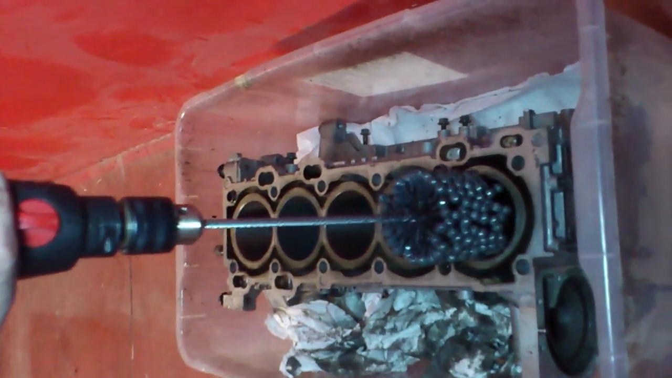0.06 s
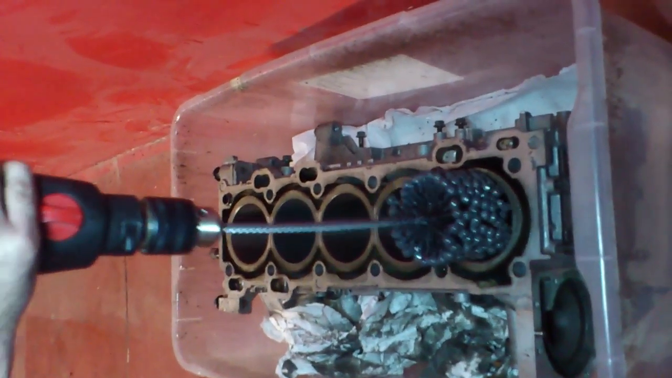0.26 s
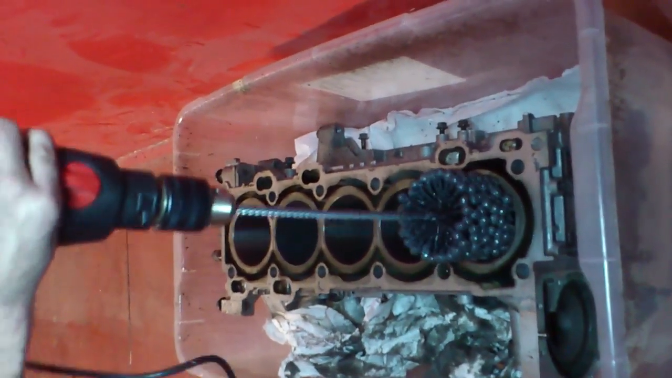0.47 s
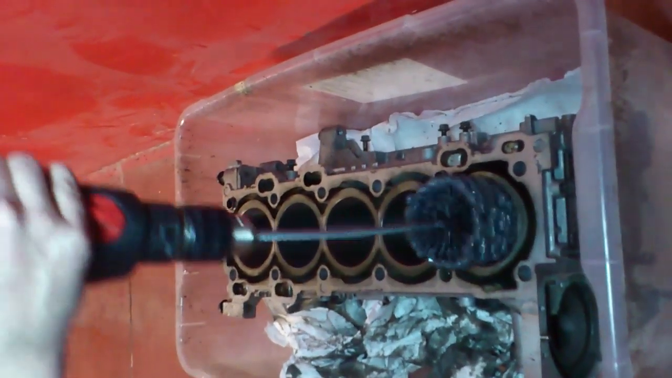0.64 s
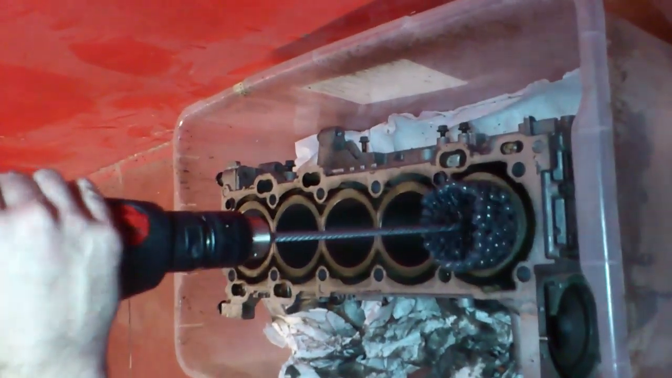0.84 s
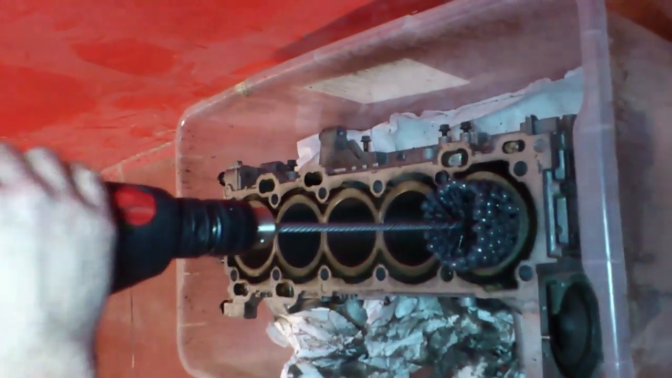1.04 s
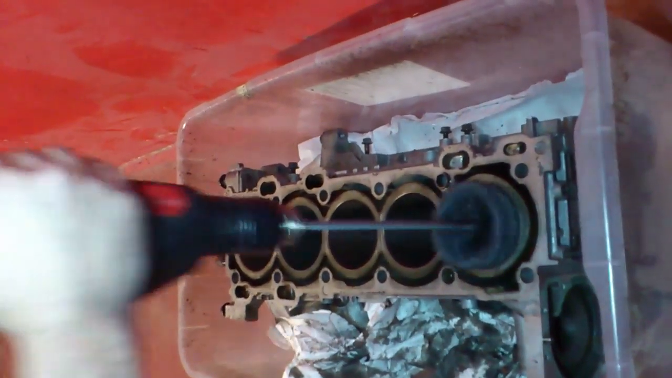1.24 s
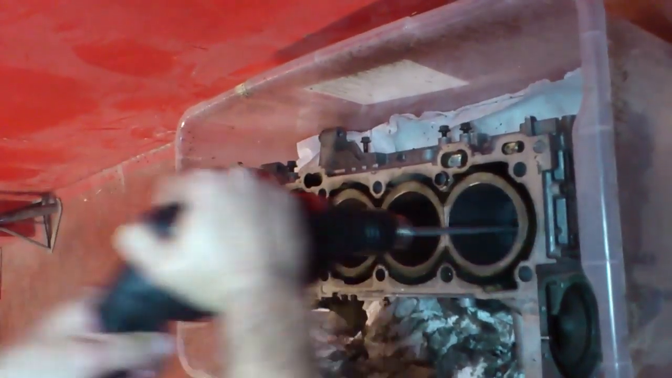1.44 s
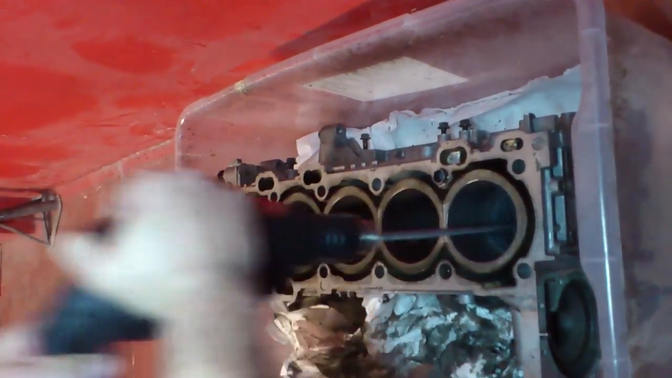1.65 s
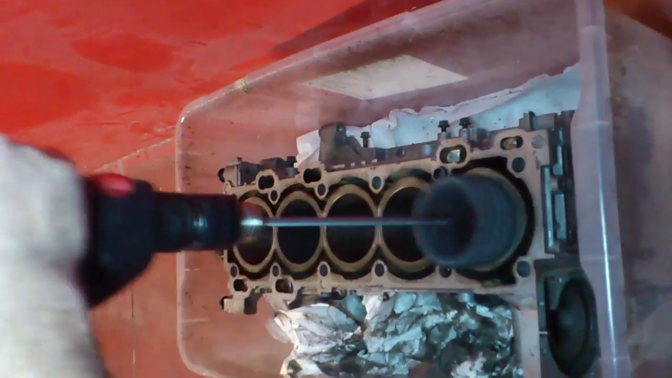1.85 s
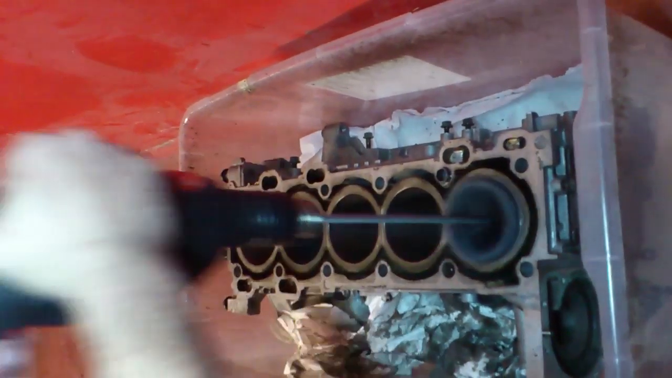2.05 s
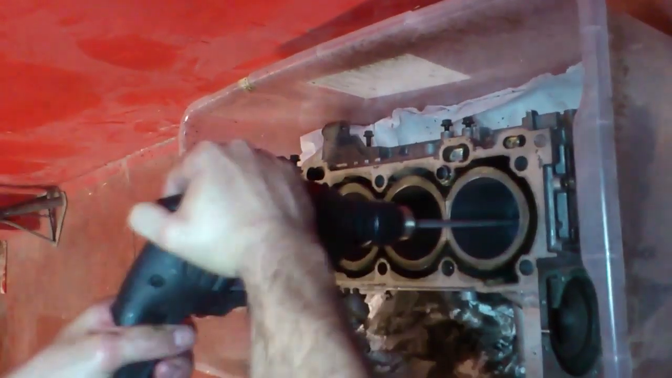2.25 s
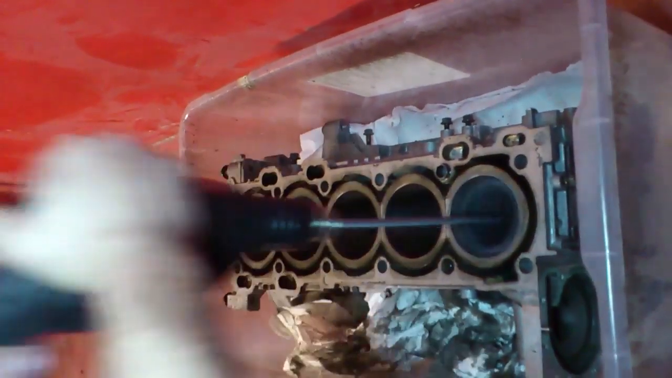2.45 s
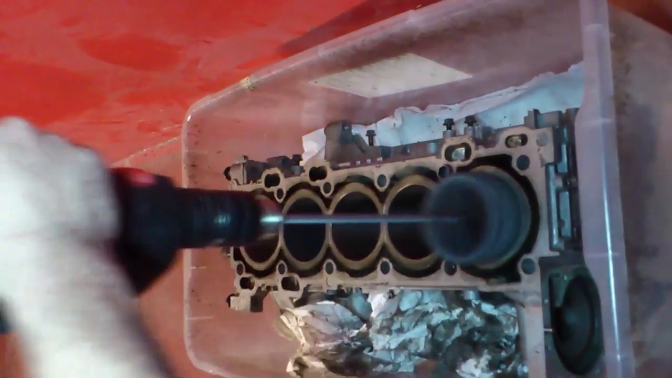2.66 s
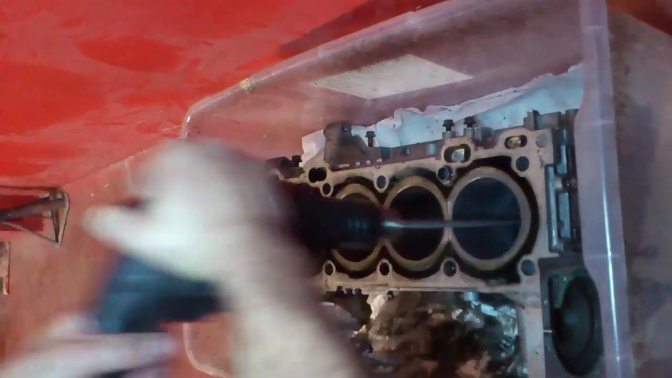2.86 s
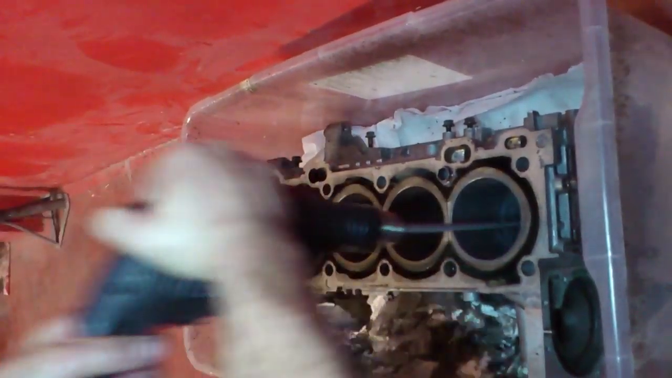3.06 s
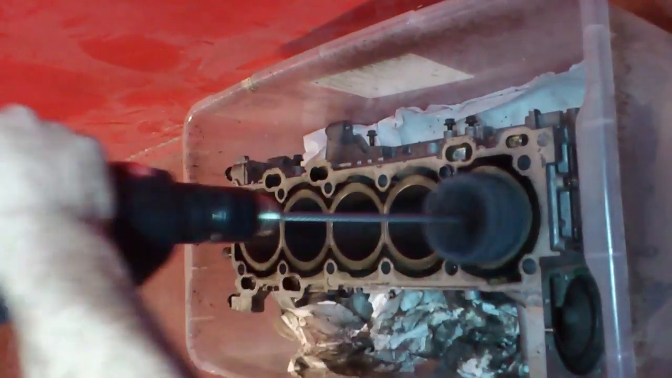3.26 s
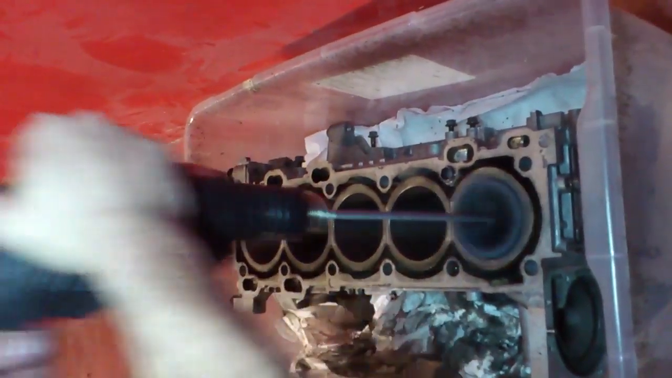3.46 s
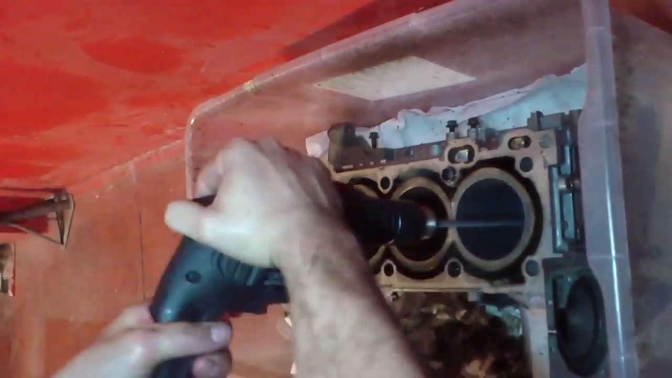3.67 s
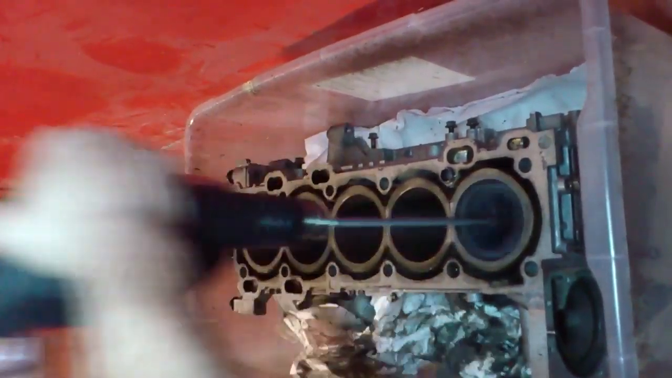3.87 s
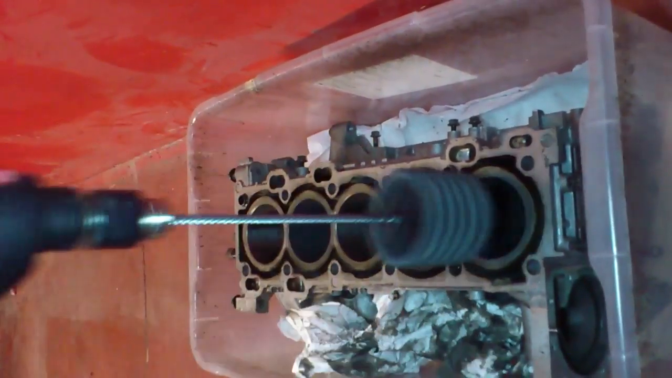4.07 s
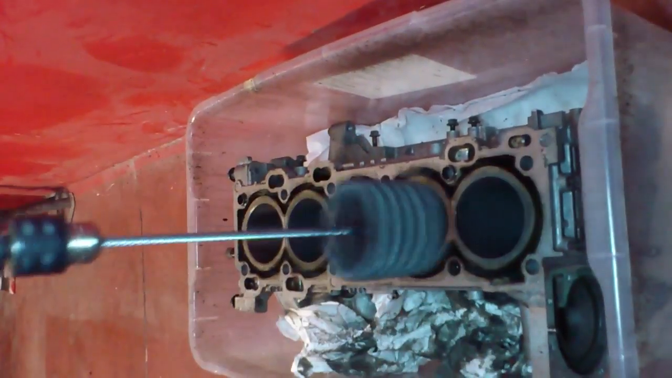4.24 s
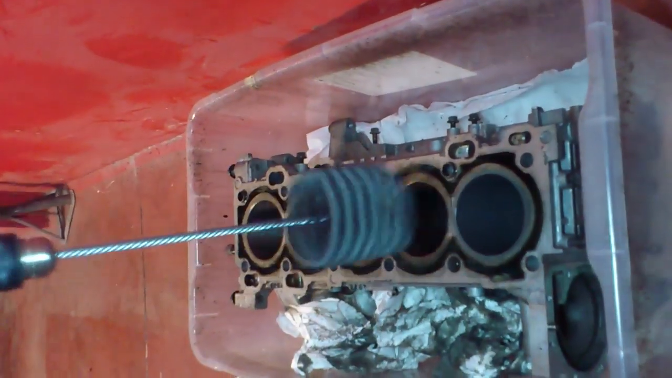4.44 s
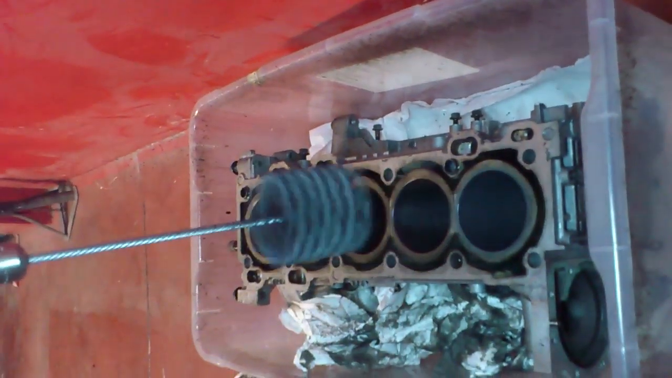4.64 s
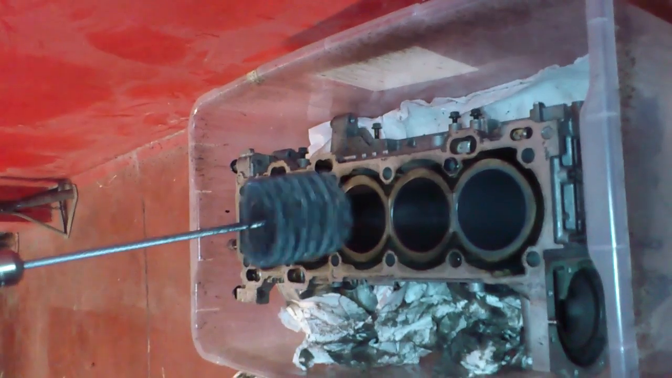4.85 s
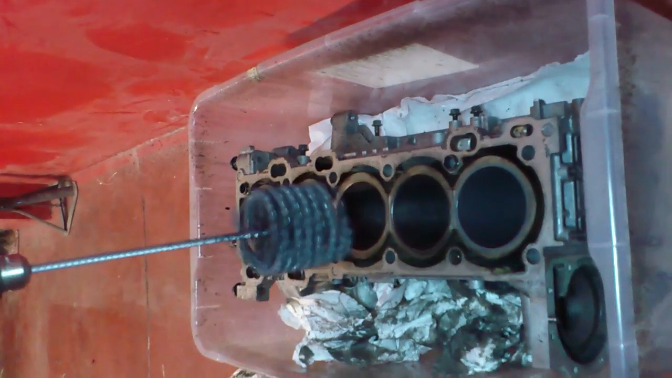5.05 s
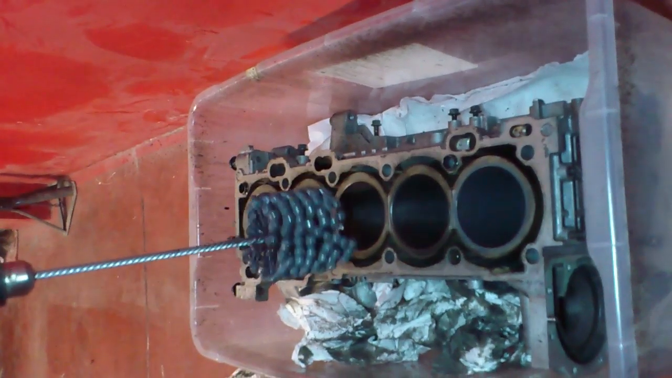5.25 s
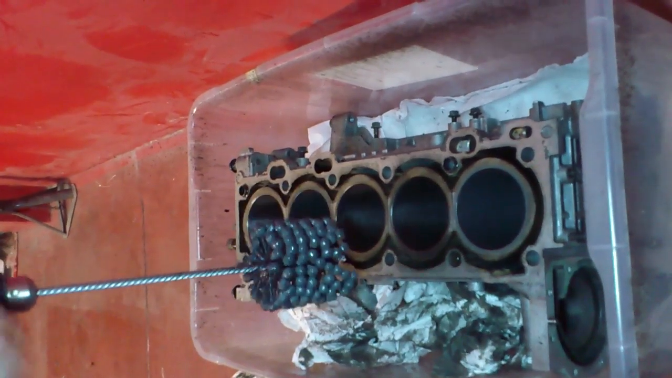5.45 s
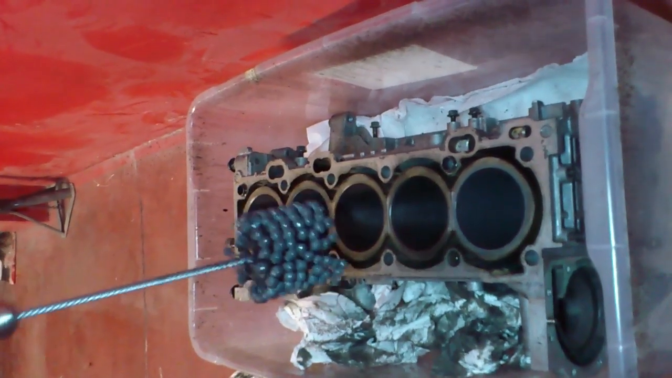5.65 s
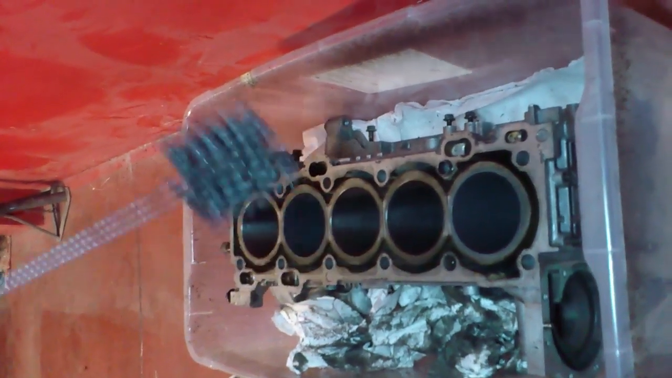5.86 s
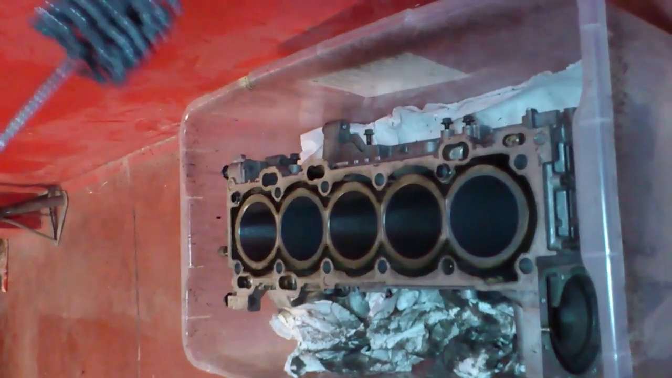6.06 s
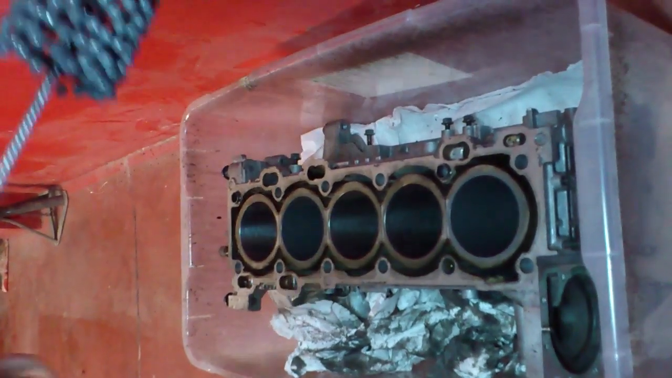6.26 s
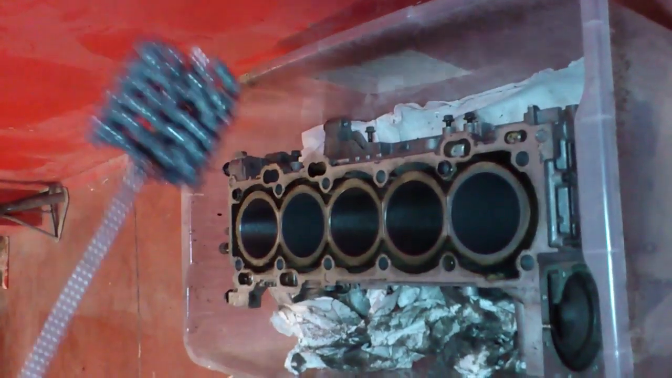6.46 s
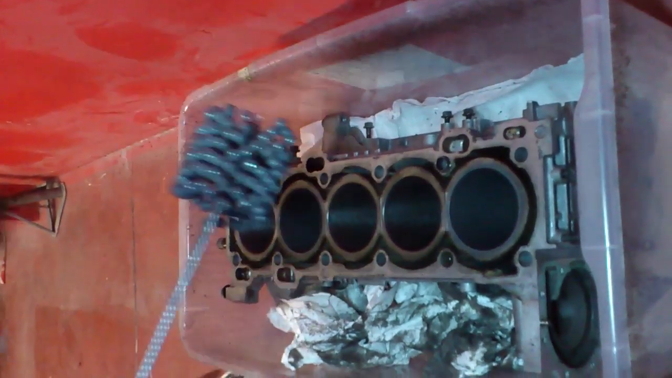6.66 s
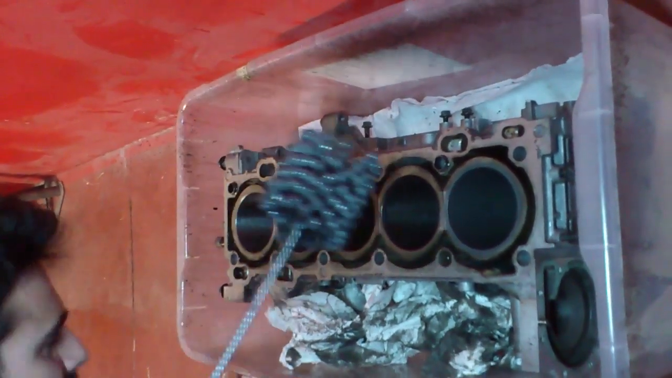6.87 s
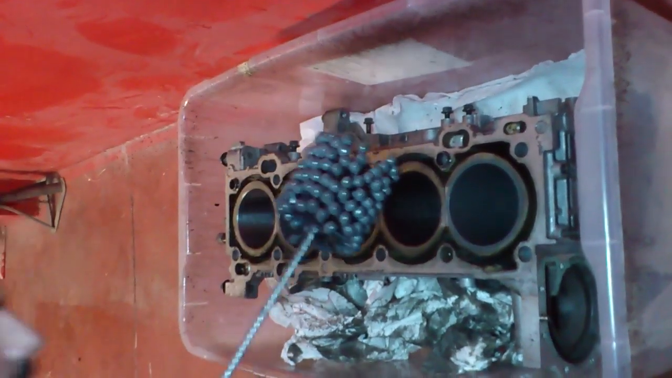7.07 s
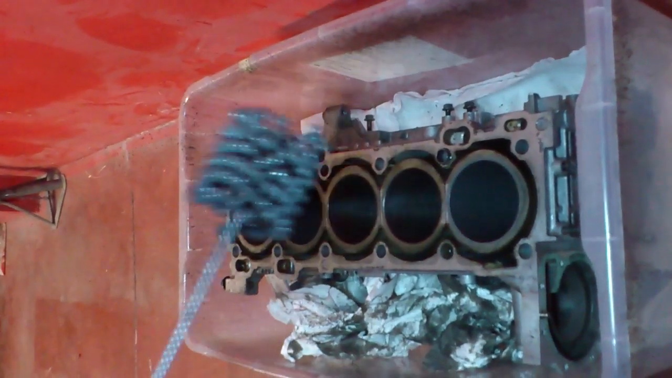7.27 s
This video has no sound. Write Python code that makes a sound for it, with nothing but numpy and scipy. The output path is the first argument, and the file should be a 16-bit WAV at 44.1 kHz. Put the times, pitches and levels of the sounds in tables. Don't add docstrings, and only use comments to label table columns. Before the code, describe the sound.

Small clicks and rustles, then a power drill drives a ball hone in loud, rhythmic scraping strokes before whining down to a fluttering stop.

```python
import sys
import numpy as np
from scipy import signal
from scipy.io import wavfile
from scipy.ndimage import uniform_filter1d

SR = 44100
rng = np.random.default_rng(int(sys.argv[2]) if len(sys.argv) > 2 else 0)


def unload_wav(signal):
    wavfile.write(
        sys.argv[1],
        SR,
        np.round(np.clip(np.atleast_2d(signal).T, -1, 1) * 32767).astype(np.int16),
    )


def invert_db(level):
    return 10 ** (np.asarray(level, dtype=float) / 20)


N = 322371

LEFT_LEAD = 6
POWER_ON_S, POWER_OFF_S = 1.33, 4.08
DRILL_LEAD = 4.6, 2.4
# time in seconds, tooth rate in Hz, whine level in dB.
COASTING = [(4.08, 1085, -33), (4.17, 985, -34), (4.35, 820, -38), (4.52, 655, -42), (4.71, 490, -46),
            (4.82, 400, -52), (4.95, 330, -70), (5.33, 200, -80)]
# frequency in Hz, left minus right in dB.
SCRAPE_PAN = [(60, 8), (95, 6.5), (150, 2), (240, 1), (380, 1), (600, 4), (950, -0.5), (1500, -0.5),
              (2380, -2), (3770, 2), (5980, -3), (9470, 12), (15000, 3)]


def unit(x):
    return x / np.sqrt(np.mean(x ** 2) + 1e-20)


def at_hz(points, hz):
    table_hz, value = np.array(points).T
    return np.interp(np.log(hz), np.log(table_hz), value)


def span(rows):
    s, *columns = np.transpose(rows)
    n = np.arange(round(s[0] * SR), min(round(s[-1] * SR), N))
    return n[0], [np.interp(n / SR, s, c) for c in columns]


def swell(start_s, top_s, end_s, peak_db, edge_db):
    top_s = np.clip(top_s, start_s + .002, end_s - .002)
    return [(start_s, peak_db - edge_db), (top_s, peak_db), (end_s, peak_db - edge_db)]


def add(out, start, sound, fade=.003):
    n = np.arange(sound.shape[-1])
    out[:, start:start + len(n)] += sound * np.clip(np.minimum(n, n[::-1]) / (fade * SR), 0, 1)


def drift(size, rate):
    r = np.exp(-80 * np.pi * rate / SR)
    slow = signal.lfilter([1], [1, -2 * r, r * r], rng.standard_normal(size // 40 + 1002))
    return np.interp(np.arange(size) / 40, np.arange(size // 40 + 2), unit(slow)[1000:])


def resonate(x, hz, width_hz):
    r = np.exp(-np.pi * width_hz / SR)
    feedback = [1, -2 * r * np.cos(2 * np.pi * hz / SR), r * r]
    return signal.lfilter(np.array([1, 0, -1]) * (1 - r * r) / 2, feedback, x)


def left_right(pan_db):
    return np.array([[pan_db], [-pan_db]]) / 2


def placed(x, pan_db, lead=DRILL_LEAD[0]):
    n = np.arange(len(x))
    return np.array([invert_db(pan_db / 2) * np.interp(n + lead, n, x), invert_db(-pan_db / 2) * x])


def grit(size, per_s, spread_db):
    hit = rng.random((4, size)) < per_s / SR
    sizes = invert_db(spread_db * np.minimum(rng.exponential(1, (4, size)), 3))
    return unit(hit * sizes * rng.standard_normal((4, size)))


def colour(drive, tone, pan, alike, shape_db, patchy_db, lead=LEFT_LEAD, count=3):
    # (Hz, share)
    regions = [(700, 0.97), (2500, 0.15)], [(7000, 0.007), (9500, 0.87)], [(2500, 0.13), (4500, 1), (5800, 0.29)]
    size, out = drive.shape[1], 0
    edges = 16500 / 2 ** np.arange(0, np.log2(16500 / tone[0][0]) + .3, 1 / count)
    together = drift(size, 9.9)
    for k, (high, low) in enumerate(zip(edges, edges[1:])):
        hz = np.sqrt(low * high)
        sos = signal.butter(2, [low, high], "band", fs=SR, output="sos")
        pair = 2 * (k % 2)
        shared, own = signal.sosfilt(sos, drive[pair:pair + 2])
        likeness = np.clip(at_hz(alike, hz), 0, 1)
        mid, side = np.sqrt(1 + likeness) * shared, np.sqrt(1 - likeness) * own
        swing_db = sum(at_hz(region, hz) * db for region, db in zip(regions, shape_db))
        flicker_db = patchy_db * (0.38 * together + drift(size, 14.0))
        gain = invert_db(at_hz(tone, hz) + swing_db + flicker_db)
        left = invert_db(at_hz(pan, hz) / 2)
        out = out + gain * np.array([left * np.roll(mid + side, -lead), (mid - side) / left])
    return unit(out)


def rub(out, rows, tone, pan, per_s, spread_db, patchy_db, trim_db, follows=(), shape_db=(), extra_db=0,
        lead=LEFT_LEAD, fade=.003):
    # frequency in Hz, likeness from 0 to 1.
    near_alike = [(100, .1), (300, .4), (600, 0.85), (2500, 0.21), (6000, 0.083), (15000, .25)]
    start, (level_db,) = span(rows)
    shape_db = shape_db or [share * (level_db - np.median(level_db)) for share in follows]
    drive = grit(len(level_db), per_s, spread_db)
    sound = colour(drive, tone, pan, near_alike, shape_db, patchy_db, lead)
    add(out, start, invert_db(level_db + trim_db + extra_db) * sound, fade)


def line(tooth_hz, multiple, level_db, waver_db, jitter):
    size = len(tooth_hz)
    hz = multiple * tooth_hz * (1 + jitter * drift(size, 30.0))
    phase = 2 * np.pi * np.cumsum(hz) / SR
    return np.sqrt(2) * invert_db(level_db + waver_db * drift(size, 31.0)) * np.sin(phase)


def through_housing_db(hz, centre_hz, width_hz):
    return -20 * np.log10(1 + ((hz - centre_hz) / width_hz) ** 2)


def backlash(per_s, t60, resonances, level_db, spread_db=5):
    size = len(per_s)
    turns = np.cumsum(per_s * invert_db(2.0 * drift(size, 60.0))) / SR
    force_db = spread_db * np.clip(rng.standard_normal(size), -2, 1)
    knocks = np.diff(np.floor(turns), prepend=0) * invert_db(force_db)
    decay = invert_db(-60 / (t60 * SR))
    burst = signal.lfilter([1], [1, -decay], knocks) * rng.standard_normal((2, size))
    burst[1] = 0.62 * np.roll(burst[0], LEFT_LEAD) + 1.2 * burst[1]
    rings = sum(invert_db(db + left_right(pan)) * unit(resonate(burst, hz, width))
                for hz, width, db, pan in resonances)
    return invert_db(level_db[:size]) * unit(rings)


def stroke(start_s, end_s):
    turns_s = [
        1.33,
        1.671,
        2.04,
        2.421,
        2.75,
        3.13,
        3.46,
        3.84,
        4.15,
    ]
    turn_speeds = [1, .96, 1.02, .995, .995, 1, .993, 1.005, 1]
    # share of stroke, tooth rate in Hz, pressure in dB.
    stroke_cycle = [(0.0, 916.8, -9), (.14, 946.8, -13.0), (.29, 1003, -12.5), (.41, 1138, -15),
                    (.5, 1185, -8), (.62, 1104, -10.5), (.75, 1022, -10), (.88, 948.4, -7.5),
                    (1.0, 920.3, -8)]
    n = np.arange(round(start_s * SR), round(end_s * SR))
    turn = np.interp(n / SR, turns_s, np.arange(len(turns_s)) / 2 - .5)
    share, cycle_hz, cycle_db = np.transpose(stroke_cycle)
    lag = np.clip(.42 * np.exp((POWER_ON_S - n / SR) / .13), 0, .9)
    hz = np.interp(turn % 1, share, cycle_hz) * np.interp(n / SR, turns_s, turn_speeds) * (1 - lag)
    return n[0], turn, hz, np.interp(turn % 1, share, cycle_db)


def workshop(out):
    # frequency in Hz, level in dB per Hz.
    rumble_tone = [(12, -61.5), (20, -19), (74, -4), (166, -13), (233, -18.5), (299, -17), (395, -33),
                   (442, -17), (671, -26), (730, -23), (1730, -32.5), (1880, -17), (2230, -32.5),
                   (7810, -51), (15700, -62.5)]
    # frequency in Hz, left-right likeness.
    rumble_alike = [(60, 0.99), (180, 0.96), (550, 0.84), (1650, 0.1), (4970, -0.47), (15000, 0.01)]
    # frequency in Hz, width in Hz, level in dB.
    room_tones = [(737, 12, -59), (1840, 25, -65), (293, 4.2, -57), (79, 7.2, -62.5), (447, 6, -78.5)]
    noise = rng.standard_normal((4, N))
    floor = colour(noise, rumble_tone, [(50, 0.3), (9000, 0.1)], rumble_alike, [], patchy_db=-0.7, lead=0, count=2)
    add(out, 0, invert_db(-43.4) * floor, fade=.0001)
    for hz, width_hz, db in room_tones:
        hum = unit(resonate(rng.standard_normal((1, N)), hz, width_hz))
        add(out, 0, invert_db(db) * hum, fade=.0001)


def rustles(out):
    # start, loudest and end in seconds, peak in dB, dB lost at the ends.
    sleeve_moves = [(0.0, -0.007, .14, -54.5, 14), (0.141, .46, .6, -46, 8.5), (.93, 1.06, 1.24, -47.5, 9),
                    (5.299, 6, 5.9, -66.5, 14), (5.86, 6.5, 6.29, -65, 12.5), (6.292, 6, 6.83, -50, 16.5),
                    (6.85, 7.05, 7.17, -48.5, 14), (7.1, 7, 7.34, -54, 6.5)]
    # frequency in Hz, level in dB per Hz.
    rustle_tone = [(530, -25.5), (900, 3), (1030, -8), (1120, -8.5), (1340, -5.5), (5810, -0.5),
                   (10500, -6.5), (15700, -18)]
    for row in sleeve_moves:
        rub(out, swell(*row), rustle_tone, [(1000, 0.1), (12000, 0.091)], per_s=14000, spread_db=-1.0,
            patchy_db=-1.0, trim_db=5.5, follows=(-.3, .35), lead=0, fade=0.028)


def swishes(out):
    # start, loudest and end in seconds, peak in dB, dB lost at the ends.
    swish_gusts = [
        (6.29, 6.398, 6.5, -30, 26),
        (6.29, 6.37, 6.58, -43, 7),
        (5.88, 5.94, 6.02, -55.5, 10),
    ]
    # frequency in Hz, level in dB per Hz.
    swish_tone = [(530, -49), (900, -17), (1240, -27), (1450, -13.5), (2770, -3.5), (3270, -15), (3600, -8),
                  (7040, -15), (9270, -12), (15700, -26.5)]
    for row in swish_gusts:
        rub(out, swell(*row), swish_tone, [(1000, 0.21), (12000, 0.2)], per_s=11000, spread_db=2.5,
            patchy_db=2.5, trim_db=4.5, follows=(-.1, -.25), lead=0, fade=.03)


def clicks(out):
    # time in seconds, peak in dB, ring in Hz, left minus right in dB, t60 in seconds.
    small_clicks = [(0.0044, -25.5, 7800, 8, 0.01), (0.1447, -37, 6000, 1, 0.038),
                    (0.1869, -32.5, 9410, 2, 0.037), (0.203, -26.5, 8940, 11, 0.027),
                    (0.2722, -37, 8830, 5.5, 0.03), (0.293, -28, 8440, 11.5, 0.03),
                    (0.3823, -27.5, 8800, 9, 0.027), (0.458, -18, 9400, 6, 0.023),
                    (0.549, -30.5, 5090, 2, 0.023), (0.618, -30, 4840, 5, 0.027),
                    (0.675, -18, 7050, 6, 0.027), (0.8627, -6, 9100, 6.5, 0.046),
                    (0.9037, -24.5, 4720, -2, 0.03), (0.9997, -29.5, 9740, 11, 0.033),
                    (1.018, -27, 4710, -3, 0.027), (1.057, -35, 4240, 3, 0.032),
                    (1.2462, -15.5, 8030, 12, 0.017), (1.2567, -16.5, 4880, 14, 0.026),
                    (1.296, -16, 4760, 5, 0.024), (5.6, -47, 4720, 3, 0.03), (5.7357, -44, 4950, 1.5, 0.03),
                    (5.802, -42, 7800, 5, 0.033), (6.136, -50, 9000, 3, 0.02),
                    (6.1727, -42, 9450, 11, 0.036)]
    t = np.arange(round(.12 * SR)) / SR
    bright = signal.butter(2, [2500, 12000], "band", fs=SR, output="sos")
    for s, db, hz, pan_db, t60 in small_clicks:
        decay = 0.84 * invert_db(-60 * t / max(t60, .005)) + 0.4 * invert_db(-60 * t / 0.0042)
        tail = rng.standard_normal((2, len(t))) * decay
        sound = signal.sosfilt(bright, tail) + 5.2 * resonate(tail, hz, 900)
        add(out, round(s * SR), invert_db(db - 9.0 + left_right(pan_db)) * sound, fade=.0001)


def bore(out):
    # start in seconds, length in seconds, frequency in Hz, width in Hz, level in dB.
    bore_booms = [(0.597, .11, 2130, 900, -41), (.76, 0.21, 1480, 69.4, -48), (1.288, .23, 786, 220, -26),
                  (1.56, .13, 220, 30, -25.5), (3.72, .1, 170, 40.4, -34)]
    for s, length, hz, width_hz, db in bore_booms:
        size = round(length * SR)
        air = resonate(resonate(rng.standard_normal(20000), hz, width_hz), hz, width_hz)
        add(out, round(s * SR), placed(invert_db(db) * unit(air[-size:]), -2.5), fade=0.021)


def twisting_in(out):
    # time in seconds, level in dB.
    twist_force = [(0.57, -58), (0.626, -43), (0.798, -28), (0.856, -28.5), (0.862, -21.5), (0.94, -42.5),
                   (1.0, -48)]
    # frequency in Hz, level in dB per Hz.
    twist_tone = [(240, -33), (400, -10.5), (664, -13.5), (728, -4.5), (1210, -16), (1450, -10),
                  (1640, -13), (4960, -1.5), (8750, -6.5), (15700, -17)]
    rub(out, twist_force, twist_tone, SCRAPE_PAN, per_s=3500, spread_db=-4.0, patchy_db=1.0, trim_db=5.5,
        follows=(-.3, .25))


def coasting_whine(out):
    # multiple of the tooth rate, level over the whine in dB, housing resonance in Hz, width in Hz.
    coast_lines = [(9.0, -2, 8800, 1300), (12.0, 4, 5400, 700)]
    start, (hz, whine_db) = span(COASTING)
    add(out, start, placed(line(hz, 6, whine_db - 2, waver_db=3, jitter=.004), 0.1, 2), fade=.03)
    for multiple, db, centre_hz, width_hz in coast_lines:
        level_db = whine_db + db + through_housing_db(multiple * hz, centre_hz, width_hz)
        add(out, start, placed(line(hz, multiple, level_db, waver_db=3.0, jitter=0.003), 1.5), fade=.03)


def flutter(out):
    # time in seconds, level in dB.
    flutter_level = [(4.08, -22.5), (4.15, -28.5), (4.77, -37), (5.22, -46.5), (5.4, -68.5)]
    # frequency in Hz, level in dB per Hz.
    flutter_tone = [(240, -31), (400, -8.5), (504, -22), (728, -1.5), (889, -4.5), (1690, -1), (2270, -6),
                    (2850, 1), (4390, 1), (5040, -5), (6540, -2), (8890, -7), (10800, -8.5), (13900, -15.5),
                    (15700, -35)]
    # frequency in Hz, left minus right in dB.
    flutter_pan = [(60, -2.0), (130, -1.5), (290, -8), (640, 0), (1410, -4), (3100, -0.5), (6820, 3.5),
                   (15000, 21.5)]
    # resonance in Hz, width in Hz, level in dB, left minus right in dB.
    backlash_rings = [(747, 170, -8, -0.5), (3320, 1100, -11, -2), (5300, 880, -5, -8.5),
                      (8730, 700, -3, 17.5), (7700, 600, -8, 6), (13500, 600, -7, 12)]
    start, (level_db,) = span(flutter_level)
    t, k = (start + np.arange(len(level_db))) / SR, np.arange(19)
    beats_s = 4.233 + .0545 * k + .0003 * k ** 2
    beats_db = 2.5 + 0.25 * rng.standard_normal(len(k))
    throb_db = sum(2 * db * np.exp(-((t - s) / 0.017) ** 2) for s, db in zip(beats_s, beats_db)) - 3.0
    rub(out, flutter_level, flutter_tone, flutter_pan, per_s=11000, spread_db=6.0, patchy_db=1.6, trim_db=3.5,
        follows=(-.2, .1), extra_db=0.72 * throb_db)
    tooth_hz = span(COASTING)[1][0]
    knocks_per_s = np.maximum(tooth_hz / 4.5, 105)
    knock_db = level_db + 3.5 + 1.3 * throb_db
    add(out, start, backlash(knocks_per_s, .022, backlash_rings, knock_db, spread_db=3), fade=0.018)


def take_up(out):
    # time in seconds, peak in dB.
    first_knocks = [(1.296, -11), (1.3055, -7), (1.3135, -7), (1.3205, -6), (1.3272, -3), (1.3325, -4),
                    (1.337, -3), (1.342, -5), (1.3465, -5), (1.3505, -4), (1.361, -6), (1.4071, -3),
                    (1.417, -6)]
    # ring in Hz, t60 in seconds, level in dB, left minus right in dB.
    take_up_rings = [(4850, .022, -1, -2), (800, .03, -17, -2), (9800, .008, -10, 8)]
    t = np.arange(round(.04 * SR)) / SR
    for s, db in first_knocks:
        for hz, t60, ring_db, pan_db in take_up_rings:
            detune = 1 + .05 * (rng.random() - .5)
            ring = invert_db(db + ring_db - 60 * t / t60) * np.sin(2 * np.pi * hz * detune * t)
            add(out, round(s * SR), placed(ring, pan_db, 9), fade=.0004)


def gears(out):
    # multiple of the tooth rate, level in dB,
    # housing resonance in Hz, width in Hz, dB gained while pulling out.
    main_lines = [(2.0, -27.5, 1940, 230, 3.0), (2.0, -27, 2300, 240, 0.5), (3.0, -28.5, 2840, 110, 3.0),
                  (3.0, -26, 3060, 90, -3.0), (3.0, -20, 3530, 220, -1.5), (4.0, -24.5, 3850, 190, 4.0),
                  (4.0, -24.5, 4150, 200, -1.0), (4.0, -27.5, 4600, 250, 3.0), (5.0, -27, 5500, 450, 6.0)]
    side_lines = [(.785, -32, 883, 89.7, -3), (1.0, -25, 1243, 109.3, -0.5), (5.0, -26, 5300, 900, 2),
                  (6.0, -43.5, 6280, 500, 2.2)]
    gear_pan_db = {2: -4, 3: 6, 4: 0, 5: 0}
    gear_lead_share = {2: 1, 3: .5, 4: .8, 5: 1}
    # resonance in Hz, width in Hz, level in dB, left minus right in dB,
    # swing in dB, share of the stroke where strongest.
    loaded_rings = [(4960, 600, -3, -2.5, 3, .58), (6150, 380, -1.5, -5.5, 5.5, .92),
                    (10080, 400, 2, 12, 0, .75), (7600, 500, -6, 3, 3.5, .15)]
    start, turn, hz, _ = stroke(POWER_ON_S, POWER_OFF_S)
    pulling = np.tanh(uniform_filter1d(np.gradient(hz) * SR, size=3000) / 400)
    lead = DRILL_LEAD[0] - DRILL_LEAD[1] * pulling
    for multiple, db, centre_hz, width_hz, pull_db in main_lines:
        k = round(multiple)
        level_db = db + pull_db * pulling + through_housing_db(k * hz, centre_hz, width_hz)
        whine = line(hz, k, level_db, waver_db=3.8, jitter=.004)
        add(out, start, placed(whine, gear_pan_db[k], gear_lead_share[k] * lead), fade=.07)
    for multiple, db, centre_hz, width_hz, pull_db in side_lines:
        level_db = db + pull_db * pulling + through_housing_db(multiple * hz, centre_hz, width_hz)
        whine = line(hz, multiple, level_db, waver_db=3.5, jitter=.004)
        add(out, start, placed(whine, -6.5, lead), fade=0.04)
    rings = [(ring_hz, width_hz, db + swing_db * np.cos(2 * np.pi * (turn - share)), pan_db)
             for ring_hz, width_hz, db, pan_db, swing_db, share in loaded_rings]
    slack_db = -14.0 - 3.8 * pulling + 1.5 * np.exp(-np.arange(len(hz)) / (.08 * SR))
    add(out, start, backlash(hz / 4, .04, rings, slack_db), fade=.02)


def honing(out):
    # time in seconds, level against full contact in dB.
    ball_contact = [(1.255, -22), (1.28, -21), (1.294, -19), (1.305, -8), (1.355, -2), (1.4, -1), (1.5, 2),
                    (3.95, -2), (4.051, -3.5), (4.13, -16), (4.2, -23)]
    # frequency in Hz, level in dB per Hz.
    scrape_tone = [(24, -52), (40, -15), (179, -15.5), (213, -10), (310, -15.5), (609, -12.5), (909, -8.5),
                   (1060, -13), (1650, -6.5), (1880, -7.5), (2180, -5), (6220, 4), (7230, 0.5),
                   (10300, -2.5), (13000, -4.5), (15700, -3.5)]
    # swing in dB, share of the stroke where strongest.
    stroke_colours = [(1, 0.85), (3, 1.01), (1.3, 0.45)]
    _, turn, _, pressure_db = stroke(ball_contact[0][0], ball_contact[-1][0])
    swings = [db * np.cos(2 * np.pi * (turn - share)) for db, share in stroke_colours]
    rub(out, ball_contact, scrape_tone, SCRAPE_PAN, per_s=20000, spread_db=1.5, patchy_db=1.46, trim_db=6.0,
        shape_db=swings, extra_db=pressure_db)


def scene():
    out = np.zeros((2, N))
    for source in (workshop, rustles, swishes, clicks, bore, twisting_in, coasting_whine, flutter, take_up,
                   gears, honing):
        source(out)
    return out


def low_pass(x):
    return signal.sosfilt(signal.butter(12, 15830, fs=SR, output="sos"), x)


def record(dry):
    mix = np.clip(dry, -1.05, 1.05)
    return low_pass(mix)


dry = scene()
out = record(dry)
unload_wav(out)
```